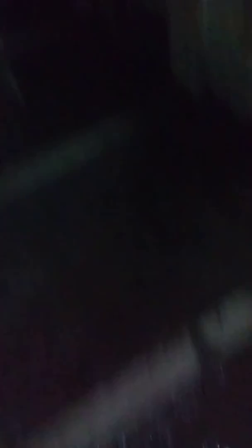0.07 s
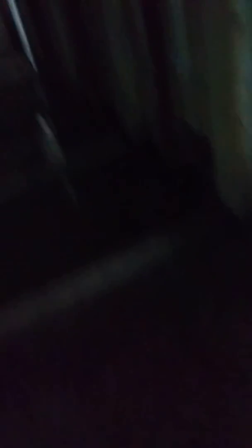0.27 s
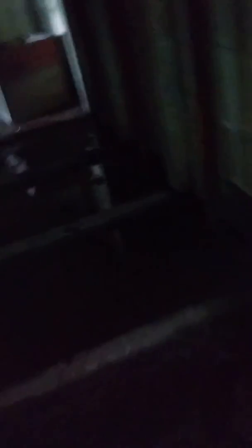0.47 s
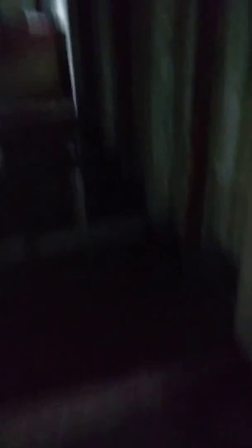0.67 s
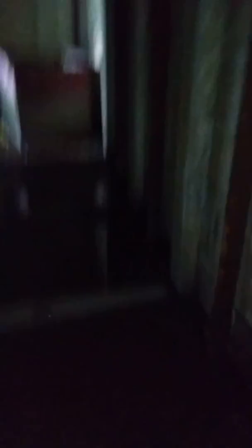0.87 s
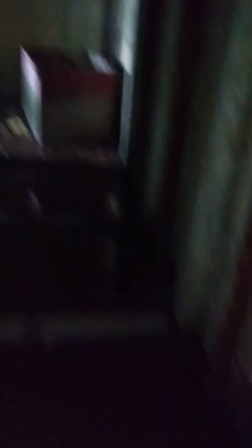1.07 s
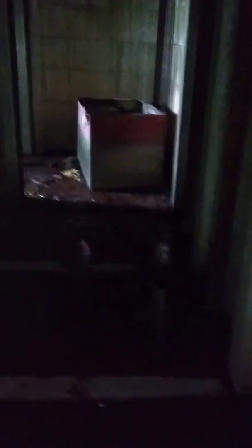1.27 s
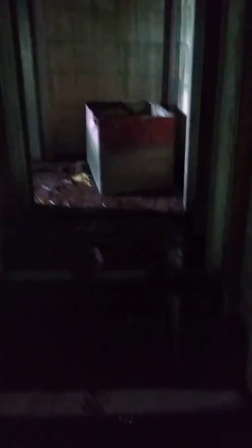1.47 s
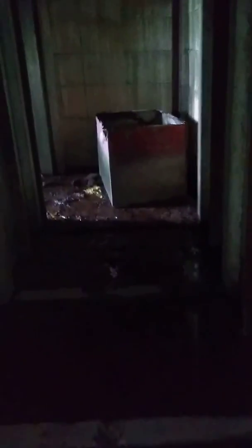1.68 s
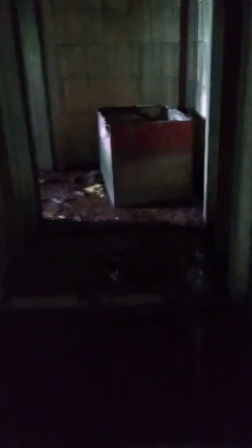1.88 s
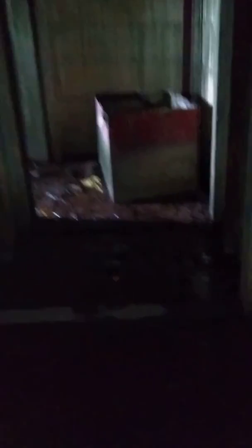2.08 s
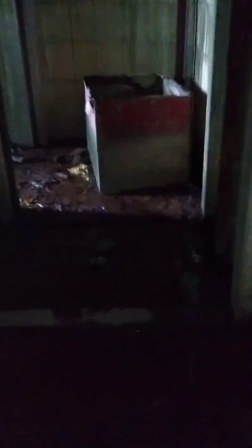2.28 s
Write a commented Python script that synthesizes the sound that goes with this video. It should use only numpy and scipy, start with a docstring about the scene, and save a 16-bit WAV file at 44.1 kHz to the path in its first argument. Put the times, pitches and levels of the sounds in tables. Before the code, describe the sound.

Slow, hollow footsteps echo through an underground passage, each of the three crunching on grit, with rustling clothes and small stone knocks. After the last step, low puffs of air hit the microphone. A faint hiss continues throughout.

```python
"""Three slow footsteps on the floor of a narrow tunnel: each impact of heel and sole thumps and excites
the reverberation and normal modes of the passage. Grit cracks under the shoe, loose stones knock, and
friction makes clothing swish between steps. Moving air buffets the two ports of a hand-held microphone.
A few thin chirps sound far off, over a low murmur of air and an even hiss."""
import sys
import numpy as np
from scipy import signal
from scipy.fft import rfft, irfft
from scipy.io import wavfile
from scipy.ndimage import uniform_filter1d

SR = 44100
rng = np.random.default_rng(int(sys.argv[2]) if len(sys.argv) > 2 else 0)


def master_out(mix):
    """Clip the mix to full scale and print it as 16-bit PCM to the path in sys.argv[1]."""
    frames = np.transpose(np.atleast_2d(mix))
    ceiling = np.clip(frames, -1, 1)
    pcm = np.round(ceiling * 32767).astype(np.int16)
    wavfile.write(sys.argv[1], SR, pcm)


N = 108045
PORT_LAG_S = .000425  # delay of the left port behind the right


def amp(db):
    """Amplitude ratio of a level in decibels."""
    return 10 ** (np.asarray(db) / 20)


def unit(x):
    """Normalisation to unit rms."""
    return x / np.sqrt(np.mean(x ** 2) + 1e-20)


def curve_at(points, hz):
    """Interpolation on a logarithmic frequency axis."""
    f, value = np.transpose(points)
    return np.interp(np.log(hz + 1), np.log(f + 1), value)


def add(mix, onset, sound):
    """Superposition of a sound on the mix from an onset in seconds."""
    part = mix[:, round(onset * SR):][:, :sound.shape[-1]]
    part += sound[..., :part.shape[1]]


def pulse(db):
    """Minimum phase: the Hilbert transform turns a magnitude spectrum into a causal click."""
    log_gain = np.log(amp(np.maximum(db, -100)))
    mirrored = np.r_[log_gain, log_gain[-2:0:-1]]
    return np.fft.ifft(np.exp(np.conj(signal.hilbert(mirrored)))).real[:4096]


def noise(spectrum, coherence, lag=0, size=512, patch_db=2, flutter_db=1):
    """Partially coherent noise at two ports, modulated by drifting spectral patches and a quick flutter."""
    hop = size // 4
    hz, frames = np.fft.rfftfreq(size, 1 / SR), N // hop + 5
    a, b, c, d, patches = rng.standard_normal((5, frames, len(hz)))
    patches = unit(uniform_filter1d(uniform_filter1d(patches, size=14, axis=0), size=8, axis=1))
    flutter = unit(uniform_filter1d(rng.standard_normal(frames), size=3))[:, None]
    shared = np.clip(curve_at(coherence, hz), -1, 1)
    right, independent = a + 1j * b, c + 1j * d
    left = (shared * right + np.sqrt(1 - shared ** 2) * independent) * np.exp(-2j * np.pi * hz * lag)
    spectra = np.array([left, right]) * amp(curve_at(spectrum, hz) + patch_db * patches + flutter_db * flutter)
    return unit(signal.istft(spectra.swapaxes(1, 2), nperseg=size, noverlap=size - hop)[1][:, :N])


# Spectra of the still air and the hiss: f/Hz, relative level/dB
AIR_SPECTRUM = [(25, -21), (60, 2.5), (140, 2.5), (300, -2.5), (600, -6.5), (1300, -8), (2200, -55),
                (15000, -63)]
HISS_SPECTRUM = [(300, -10), (1000, 2), (2000, 3), (3500, -1), (5000, -2), (7300, -3), (9500, -1),
                 (12000, 4), (14200, -1), (14700, -40)]
# Likeness of the ports for air and for hiss or swish: f/Hz, coherence (clipped to +-1; -1 is antiphase)
AIR_COHERENCE = [(50, -0.85), (170, -0.88), (350, 0.46), (700, 0.88), (1400, 0.88)]
HISS_COHERENCE = [(100, 0.015), (600, -1.1), (1200, -2.54), (2300, -1.26), (4700, -1.55), (8000, -0.34),
                  (14000, 0.12)]

def ambience():
    """Broadband background noise: the low murmur of the tunnel's air and an even hiss."""
    murmur = amp(-53) * noise(AIR_SPECTRUM, AIR_COHERENCE, size=2048)
    hiss = amp(-56) * noise(HISS_SPECTRUM, HISS_COHERENCE, PORT_LAG_S)
    return murmur + hiss


# Distant chirps: t/s, duration/s, f/Hz, level/dB
FAR_CHIRPS = [(1.781, 0.095, 5810, -57), (1.995, 0.028, 5800, -56), (2.032, 0.04, 6410, -55),
              (2.144, 0.055, 6200, -58.5), (2.21, 0.041, 6100, -56.5)]

def chirps(arch_depth=0.0254, waver_depth=0.022):
    """Frequency modulation: each faint whistle arches in pitch and wavers at random."""
    out = np.zeros((2, N))
    for onset, duration, hz, db in FAR_CHIRPS:
        arch = np.sin(np.pi * np.arange(0, duration, 1 / SR) / duration)
        waver = unit(uniform_filter1d(rng.standard_normal(SR // 4), size=150))[:len(arch)]
        pitch = hz * (1 + arch_depth * (arch - 1) + waver_depth * waver)
        add(out, onset, amp(db) * arch * np.sin(2 * np.pi * np.cumsum(pitch) / SR))
    return out


# Gaussian puffs of air on the ports: t/s, level/dB, standard deviation/s
AIR_PUFFS = [(0.069, -44, 0.00062), (0.41, -33.5, 0.00054), (0.419, -33, 0.00088), (0.5785, -22, 0.00093),
             (0.589, -28, 0.0005), (0.765, -26, 0.0019), (0.893, -30, 0.0017), (0.913, -22, 0.0016),
             (.951, -32, 0.0041), (1.043, -29, 0.0016), (1.149, -32, 0.0025), (1.483, -44, 0.0015),
             (1.997, -24, 0.00057), (2.081, -9, 0.0015), (2.117, -7, 0.0021), (2.164, -22, 0.0016),
             (2.188, -12, 0.00097), (2.381, -36, 0.0015)]
# Eddies round the microphone: t/s, level/dB, half-width at 1/e of the peak/s
AIR_EDDIES = [(0.926, -41, 0.094), (1.3, -50, 0.15), (2.13, -32, 0.061)]
# Spectrum of an eddy: f/Hz, relative level/dB
EDDY_SPECTRUM = [(25, -30), (38, -16), (55, 2), (110, -4.5), (200, -21), (400, -20), (1500, -57)]

def buffets(low_cut_hz=48.6, right_gain=-1.243):
    """Turbulent pressure: puffs and eddies drive the ports in opposite directions, the left one later."""
    t = np.arange(N) / SR
    puffs = sum(amp(db) * np.exp(-.5 * ((t - peak) / width) ** 2) for peak, db, width in AIR_PUFFS)
    puffs = signal.sosfilt(signal.butter(5, low_cut_hz, btype="high", fs=SR, output="sos"), puffs)
    swirl = sum(amp(db) * np.exp(-((t - peak) / width) ** 2) for peak, db, width in AIR_EDDIES)
    pressure = puffs + swirl * noise(EDDY_SPECTRUM, AIR_COHERENCE, size=2048)[0]
    return np.array([np.interp(t - PORT_LAG_S, t, pressure), right_gain * pressure])


# Envelope of the swish: t/s, treble level/dB, midrange level/dB
SWISH_ENVELOPE = [(0, -52, -57.5), (.15, -53.5, -54), (.23, -47, -48), (.4, -40.5, -43), (.56, -44.5, -43),
                  (.61, -47.5, -48), (.68, -39.5, -44), (.74, -46.5, -48), (.96, -50.5, -52),
                  (1.14, -54, -57), (1.28, -48, -48.5), (1.44, -56, -56), (1.511, -61, -80),
                  (1.84, -58, -62.5), (1.97, -49.5, -53.5), (2.09, -51.5, -55), (2.19, -55, -57),
                  (2.45, -81, -64)]
# Spectra of its two bands: f/Hz, relative level/dB
TREBLE_SPECTRUM = [(1000, -35), (3000, -9), (5000, -9), (7300, -10.5), (9500, -6), (11000, -1.5),
                   (12200, 1), (13300, -2.5), (14200, -4), (14700, -42)]
MIDRANGE_SPECTRUM = [(80, -15), (230, -2), (400, -2), (650, 0), (1300, -1), (2000, -1.5), (2700, 0),
                     (3600, -3), (5000, -13), (8000, -24), (15000, -40)]

def clothing():
    """Friction noise: fabric slides on fabric as the legs swing."""
    times, treble_db, mid_db = np.transpose(SWISH_ENVELOPE)
    t = np.arange(N) / SR
    treble = amp(np.interp(t, times, treble_db)) * noise(TREBLE_SPECTRUM, HISS_COHERENCE, PORT_LAG_S)
    midrange = amp(np.interp(t, times, mid_db)) * noise(MIDRANGE_SPECTRUM, HISS_COHERENCE, PORT_LAG_S)
    return treble + midrange


def decay(t, t60):
    """Exponential damping: the level falls 60 dB in t60 seconds."""
    return np.exp(-np.log(1000) * t / t60)


# Reverberation time of the tunnel: f/Hz, T60/s
TUNNEL_DECAY = [(60, 1.9), (150, 2.8), (300, 1.36), (700, 0.88), (1500, 0.27), (4000, 0.053),
                (14000, 0.082)]

def reverberation(t60=TUNNEL_DECAY, side_db=-5):
    """Diffuse field: dense wall reflections of equal energy per hertz, each band dying at its own rate."""
    hz, t, bands = signal.stft(rng.standard_normal((2, SR)), SR, nperseg=256)
    bands = bands * decay(t, curve_at(t60, hz)[:, None])
    spectrum = rfft(signal.istft(bands, SR, nperseg=256)[1][:, :SR])
    whitened = spectrum / np.sqrt(uniform_filter1d(abs(spectrum) ** 2, size=160, axis=1))
    mid, side = irfft(whitened)[:, :SR - SR // 10]
    return np.array([mid + amp(side_db) * side, mid - amp(side_db) * side])


# Loose stones landing: t/s, level/dB, f/Hz
STONE_KNOCKS = [(0.753, -34, 830), (0.792, -31, 750), (0.835, -32.5, 800), (1.27, -35, 650),
                (1.5257, -36.5, 660), (1.566, -43, 477)]

def stones(t60_s=0.013, room_db=-8.5):
    """Damped oscillation: each kicked stone lands with a short, dull knock that reverberates."""
    out, t = np.zeros((2, N)), np.arange(SR // 10) / SR
    for onset, db, hz in STONE_KNOCKS:
        add(out, onset, amp(db) * decay(t, t60_s) * np.sin(2 * np.pi * hz * t))
    return out + amp(room_db) * signal.fftconvolve(out, reverberation(), axes=1)[:, :N]


# Cracks: t/s, level/dB, time constant/s, tilt/(dB per octave), first snap re cluster/dB
GRIT_CRACKS = [(0.58, -4.5, 0.002, -5.5, -5), (0.7917, -12.5, 0.0005, 1.5, -0.5),
               (1.2396, 1, 0.0009, -1.5, -1), (1.2412, -4.5, 0.014, 4.5, -7), (1.8722, -0.5, 0.02, -2, -26),
               (1.886, -3, 0.059, -2, -13), (1.958, -11.5, 0.016, 2.5, -20), (2.085, -17, 0.016, 11.5, -15),
               (2.135, -11, 0.00053, 9.5, 16), (2.135, -25, 0.00052, -3, 8)]
# Spectrum of a snap: f/Hz, relative level/dB
SNAP_SPECTRUM = [(100, -16), (700, -11.5), (1800, -5.5), (3300, 0.5), (5000, -11.5), (7500, -8.5),
                 (10000, -8), (12500, 0), (14400, -19), (15500, -41)]

def grit(scatter=.6, spread_db=3, room_db=-17):
    """Brittle fracture: grit under the shoe gives a first snap and a quickly dying cluster of others."""
    out, hz = np.zeros((2, N)), np.fft.rfftfreq(8192, 1 / SR)
    t = np.arange(SR // 10) / SR
    for onset, db, tau, tilt_db, snap_db in GRIT_CRACKS:
        shared, strength, independent = rng.standard_normal((3, len(t)))
        ports = np.array([scatter * independent - shared, shared])  # the left port is inverted
        snaps = ports * amp(spread_db * strength) * np.exp(-t / tau)
        snaps[:, 0] = amp(snap_db) * np.linalg.norm(snaps, axis=1) * [1, -1]
        snaps /= np.linalg.norm(snaps, axis=1, keepdims=True)
        click = pulse(curve_at(SNAP_SPECTRUM, hz) + tilt_db * np.log2((hz + 200) / 6000))
        left, right = amp(db) * signal.fftconvolve(snaps, click[None])
        add(out[:1], onset + PORT_LAG_S, left)
        add(out[1:], onset, right)
    return out + amp(room_db) * signal.fftconvolve(out, reverberation(side_db=0), axes=1)[:, :N]


# Tunnel resonances: f/Hz, relative level at the first impact/dB, at the last/dB, T60/s
NORMAL_MODES = [(112, -13, -17, 3.8), (133.6, -8, -14.5, 2.2), (156.3, 1, -3, 0.8), (248, -4, 3.5, 0.81),
                (334.3, -6, 4.5, 0.45), (439.5, -2.5, -6, 0.75), (459, 2, -0.5, 0.48),
                (545.7, 4.5, -11, 0.38), (602, -13, -1.5, 0.65), (637.8, 0, -13, 0.67), (680, 0, -23, 0.28),
                (710.3, 1, 3, 0.35), (852, 1.5, -6, 0.67), (944, -3, -7, 0.65), (1030, 2, -21, 0.89),
                (1320, 1.5, -8, 0.82)]

def tunnel_ring(t, walked):
    """Normal modes: their excitation depends on the walker's position, 0 to 1 along the path."""
    ring = np.zeros(len(t))
    for hz, first_db, last_db, t60 in NORMAL_MODES:
        excitation = amp(first_db + walked * (last_db - first_db))
        ring += excitation * decay(t, t60) * np.sin(2 * np.pi * (hz * t + rng.random()))
    return ring / np.linalg.norm(ring)


# Heel and sole impacts: t/s, relative level/dB, hollow peak f/Hz, its half-width/Hz, its lift/dB,
# bass lift/dB, reverberation level/dB, modal level/dB
IMPACTS = [(0.586, -4.5, 760, 270, 11.5, -2.5, -5, -16), (0.617, -9, 700, 150, 12.5, 4, -4, -12.5),
           (1.195, -6.5, 484, 197, 3, 1.5, -7, -18.5), (1.865, -9, 720, 193, 7.5, 1, -5.5, -12.5),
           (1.884, -8, 460, 300, 7, -3.5, -7.5, -15), (1.904, -15.5, 336, 200, 7.5, -1.5, -2, -16.5)]
# Spectrum of an impact: f/Hz, relative level/dB
THUD_SPECTRUM = [(40, -31), (100, -4.5), (160, -2), (330, -2), (600, -1.5), (1000, -7.5), (1500, -14),
                 (2200, -43), (5000, -26.5), (15000, -52)]

def footsteps(gain_db=17.5, direct_db=-14, early_db=-5, early_t60_s=0.19):
    """Impact excitation: each hollow thud is convolved with the impulse response of the tunnel."""
    out, hz = np.zeros((2, N)), np.fft.rfftfreq(8192, 1 / SR)
    first, last = IMPACTS[0][0], IMPACTS[-1][0]
    for onset, db, hollow_hz, width_hz, lift_db, bass_db, tail_db, ring_db in IMPACTS:
        hollow = lift_db / (1 + ((hz - hollow_hz) / width_hz) ** 2)
        bass = bass_db / (1 + (hz / 300) ** 4)
        thud = pulse(curve_at(THUD_SPECTRUM, hz) + hollow + bass)
        tail = reverberation()
        ring = tunnel_ring(np.arange(tail.shape[1]) / SR, walked=(onset - first) / (last - first))
        near_walls = reverberation([(1, early_t60_s)])  # one decay time for all bands
        response = amp(tail_db) * tail + amp(ring_db) * ring + amp(early_db) * near_walls
        response[:, 0] += amp(direct_db)
        add(out, onset, amp(db + gain_db) * signal.fftconvolve(response, thud[None]))
    return out


def scene():
    """Linear superposition: the pressures of all sources add at each port."""
    return footsteps() + grit() + stones() + clothing() + buffets() + chirps() + ambience()


# Balance of the two sides: f/Hz, left minus right level/dB
SIDE_BALANCE = [(60, 0.5), (700, -1), (2000, -2.5), (5000, -1), (8000, -3.5), (14000, -7.5)]

def record(dry, cutoff_hz=15400):
    """Linear filtering: the left side sounds duller, and the highest treble is cut off on both sides."""
    lean_db = curve_at(SIDE_BALANCE, np.fft.rfftfreq(N, 1 / SR)) / 2
    leaned = irfft(rfft(dry) * amp([lean_db, -lean_db]), N)
    low_pass = signal.firwin(301, cutoff_hz, window=("kaiser", 8), fs=SR)
    return signal.oaconvolve(leaned, low_pass[None], "same")


dry = scene()
out = record(dry)
master_out(out)
```